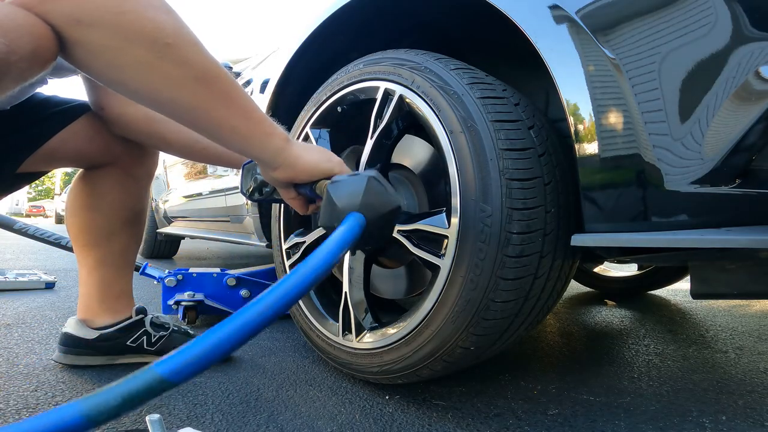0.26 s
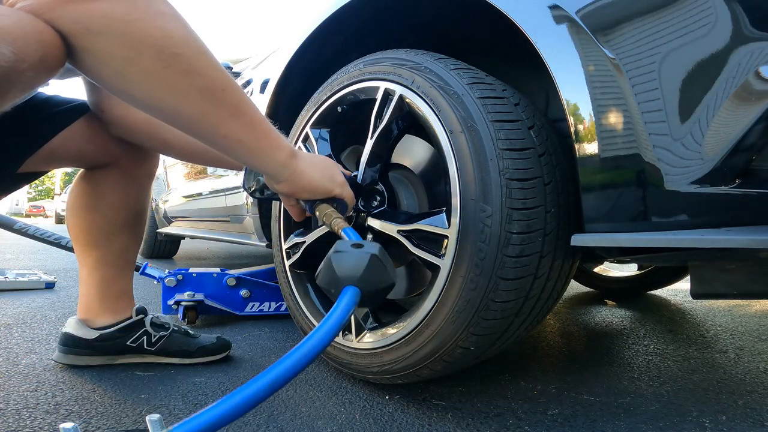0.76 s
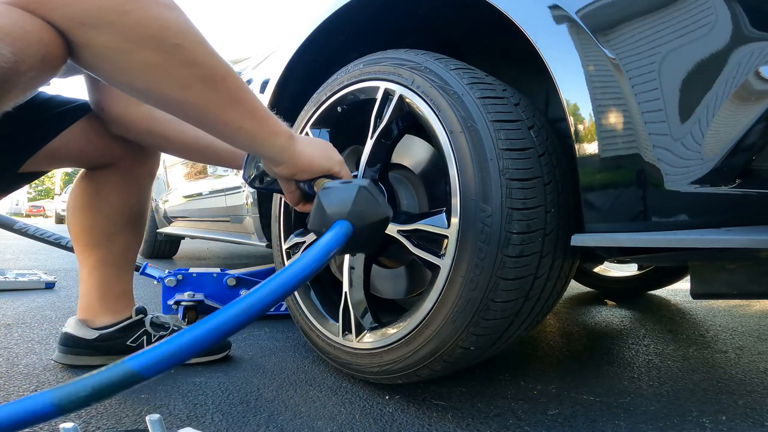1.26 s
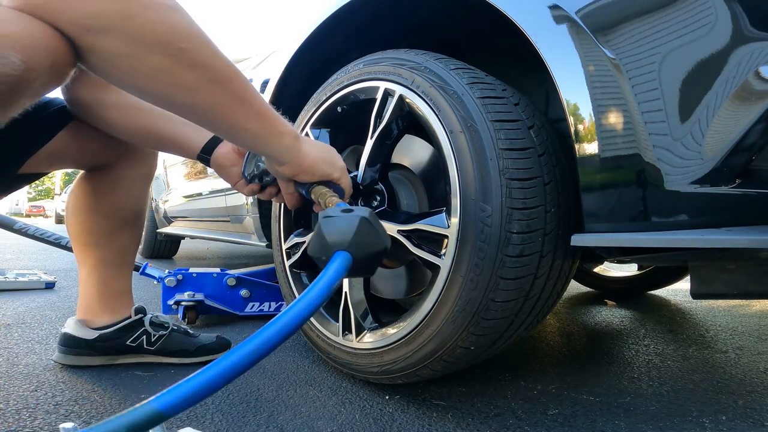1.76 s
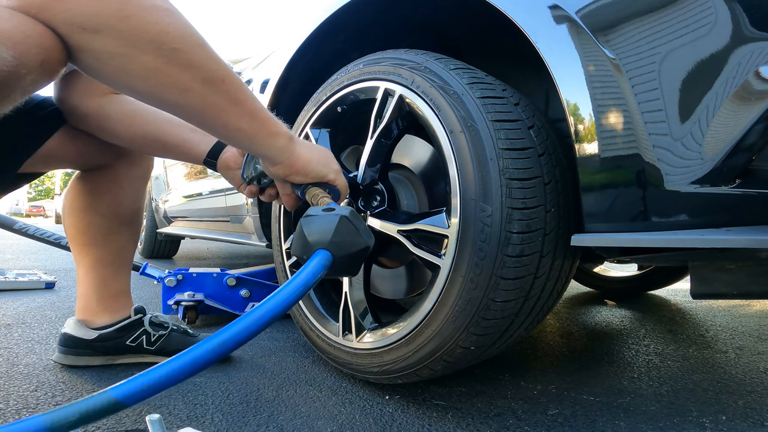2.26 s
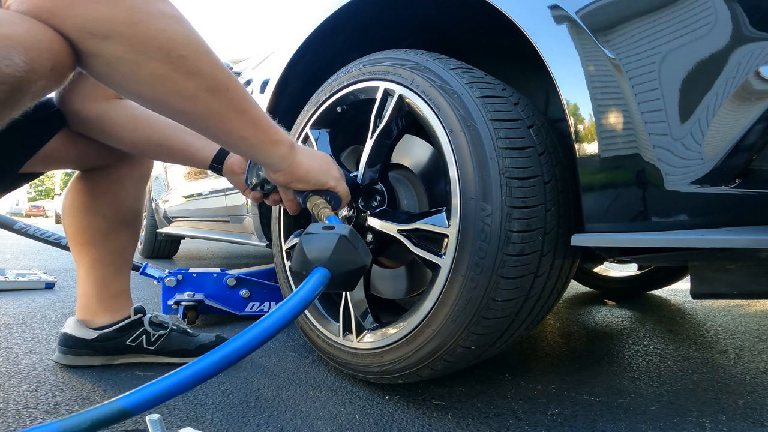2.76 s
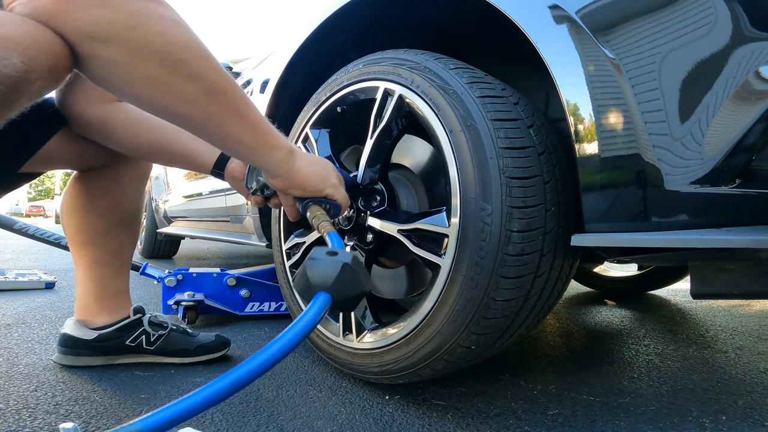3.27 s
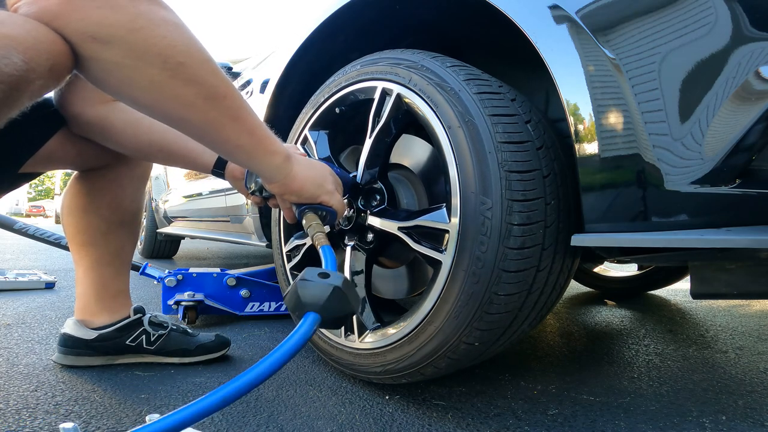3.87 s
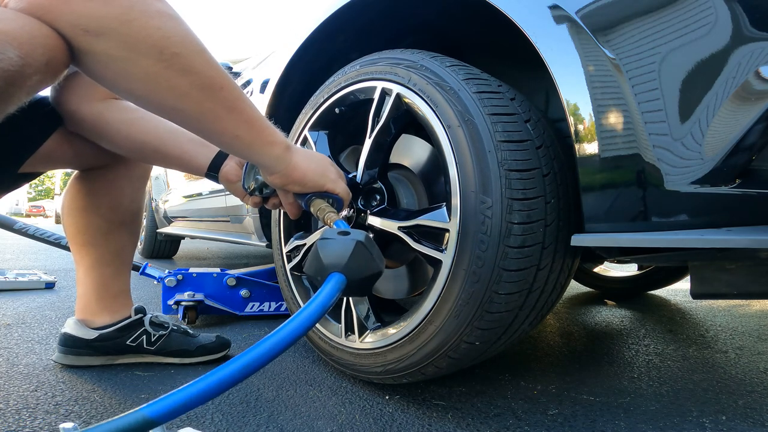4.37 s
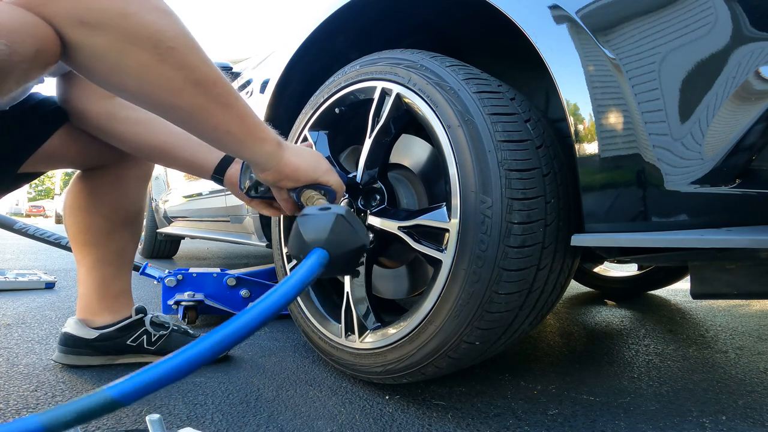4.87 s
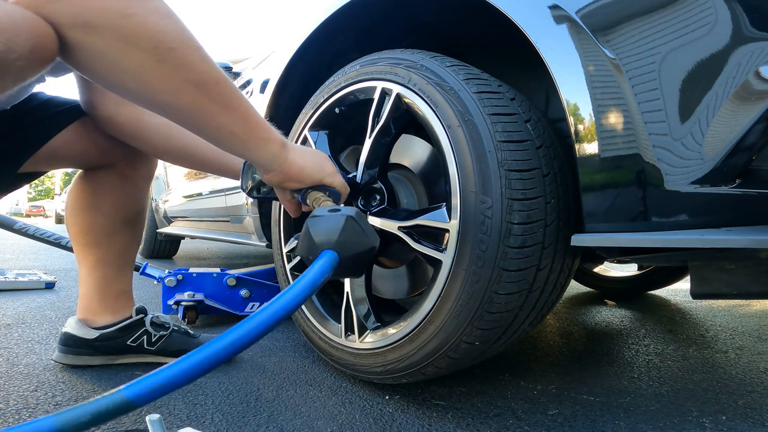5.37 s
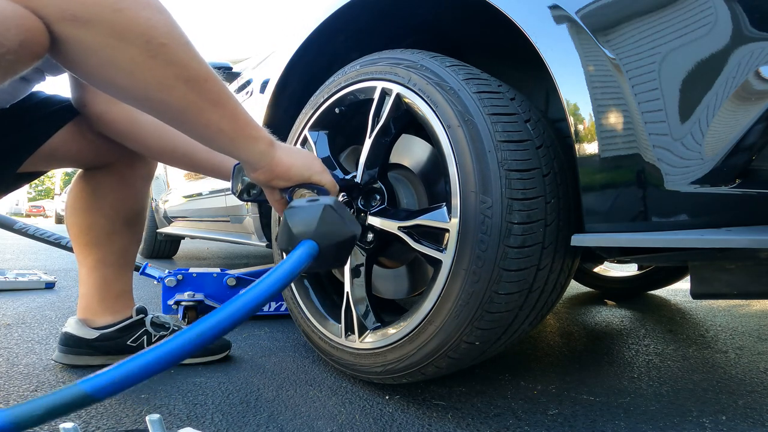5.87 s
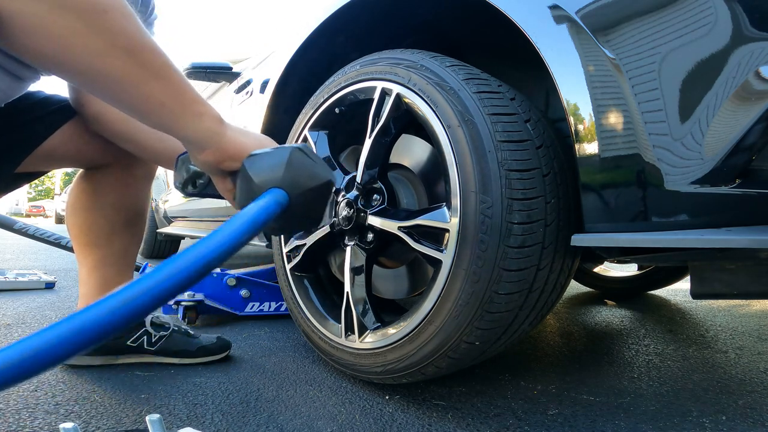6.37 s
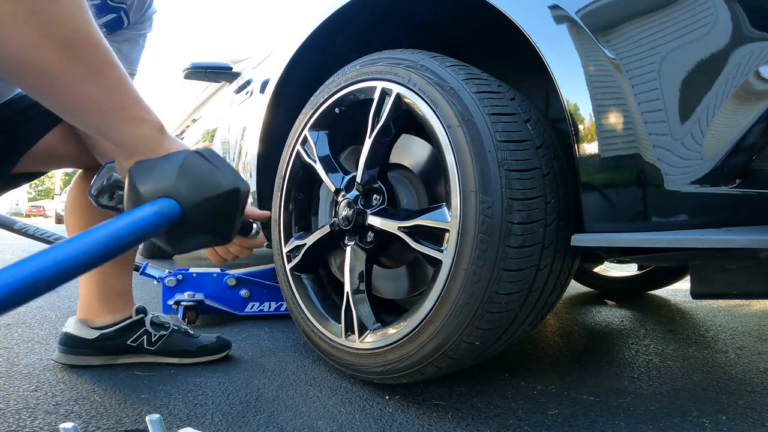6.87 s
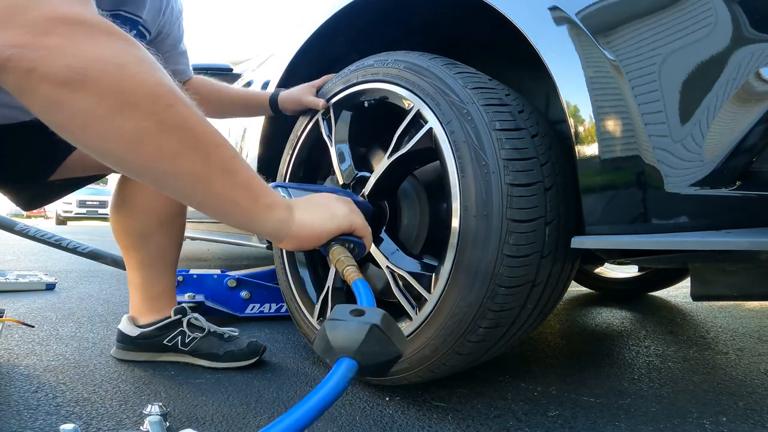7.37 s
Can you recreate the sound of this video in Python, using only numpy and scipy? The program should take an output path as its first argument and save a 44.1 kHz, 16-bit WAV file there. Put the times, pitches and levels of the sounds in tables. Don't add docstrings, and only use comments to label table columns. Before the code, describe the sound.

Close to a car wheel outdoors, a leaking air hose whistles and hisses for about two seconds, with one sharp metal tick. The wrench vents and hammers briefly, pauses, then fires several clanking bursts with exhaust blasts, tyre thuds and rim ringing. Two last pulls free the motor, which whirs upward and coasts down. Loose metal knocks follow while the hiss returns. Small nearby camera, nearly mono, with faint traffic rumble.

```python
import sys
import numpy as np
from scipy import signal
from scipy.fft import rfft, irfft, next_fast_len
from scipy.io import wavfile
from scipy.ndimage import uniform_filter1d, map_coordinates

SR = 44100
rng = np.random.default_rng(int(sys.argv[2]) if len(sys.argv) > 2 else 0)


def level_to_linear(level):
    exponent = np.asarray(level, float) / 20
    return 10 ** exponent


def to_wav(sig):
    pcm = np.clip(np.atleast_2d(sig), -1, 1) * 32767
    pcm = np.round(pcm).astype(np.int16)
    wavfile.write(sys.argv[1], SR, pcm.T)


N = 336042
T = np.arange(N) / SR


def unit(x):
    return x / np.sqrt(np.mean(x ** 2) + 1e-20)


def along(points, hz):
    f, v = np.transpose(points)
    return np.interp(np.log(hz + 1), np.log(f + 1), v)


def curves(rows, silent=None):
    s, *columns = np.transpose(rows)
    return np.array([np.interp(T, s, column, silent, silent) for column in columns])


def swells(rows):
    return sum(depth_db * np.exp(-((T - s) / length * 2) ** 4) for s, length, depth_db in rows)


def wobble(rate):
    return map_coordinates(rng.standard_normal(int(N * rate / SR) + 4), [T * rate])


def filtered(x, response):
    m = next_fast_len(N + SR // 2)
    return irfft(rfft(x, m) * response(np.fft.rfftfreq(m, 1 / SR)), m)[..., :N]


def cavities(peaks):
    def response(f):
        return sum((-1) ** k * level_to_linear(db) * 1j * f * width / (hz * hz - f * f + 1j * f * width)
                   for k, (hz, width, db) in enumerate(peaks))
    return response


def split(x, low_hz, high_hz):
    edges = np.array([[low_hz], [high_hz]])
    low, below = filtered(x, lambda f: 1 / (1 + (f / edges) ** 12))
    return low, below - low, x - below


# t/s, peak level/dB, rim level/dB, ping f/Hz, ping over crack level/dB
JAW_BLOWS = [(2.4115, -2, -15, 2820, 0), (2.4182, -0.5, -7.5, 2870, 1), (2.4359, 1, -15.5, 3500, -4),
             (2.4528, 2, -23, 2780, -8), (3.3338, -4, -4, 3010, -2), (3.348, 0.5, -30, 2550, -3),
             (3.357, -3, -17, 3400, 9), (3.379, -5, -13, 2450, -7), (3.3975, -0.5, -17, 3370, 6.5),
             (3.4177, -2, -13, 5230, -2), (3.607, 1, -13, 2960, -4), (3.6285, 2, -19, 2500, -1),
             (3.6496, -0.5, -6.5, 3050, -7), (3.6694, -1.5, -15, 3450, 8), (3.6888, -11, -10, 2780, -3),
             (3.7093, -2.5, -4, 3440, 2), (3.9027, -10, -15, 2600, -8), (3.908, -0.5, -7.5, 3160, -8),
             (3.924, -1.5, -8, 3520, 3), (3.944, -17, -17, 2800, -4), (3.961, 0, -12, 3470, -8),
             (3.982, -9, -7, 3030, -3), (3.9999, -1, -9.5, 3500, -10), (4.2531, -0.5, -18, 3300, 5.5),
             (4.2722, -5.5, -12.5, 3520, 5), (4.2884, -6.5, -2, 2780, 8), (4.637, -8, -28, 2960, 9),
             (4.6534, -5, -6, 2960, 5), (4.6723, -3.5, -13, 2800, 6), (4.677, -13.5, -12, 1760, 9),
             (4.7556, -10.5, -6, 1770, 10.5), (5.5224, 1.5, -16, 2800, 0), (5.81, 0.5, -25, 2550, 0)]
# t/s, peak level/dB, rim level/dB, ping f/Hz
SINGLE_BLOWS = [(0.6026, -8.5, -15, 2700), (2.3947, -18, -19, 2770), (2.4928, -1, -10, 3860),
                (2.5202, -12, -1.5, 3640), (3.0296, -16, -8.5, 2340), (3.4458, 0, -9.5, 3800),
                (3.551, -11.5, -3, 2750), (3.557, -6.5, -6, 1610), (3.59, -8, -16, 2550),
                (3.8295, -8.5, -3.5, 3800), (3.842, -18.5, 5, 2610), (3.8863, -3.5, -31, 3040),
                (4.0341, -3, -4, 2800), (4.0764, -5.5, -8, 4100), (4.2367, -7, -36, 3080),
                (4.33, -11, -12, 2500), (4.349, -3, -6.5, 2980), (4.3905, -30, 10.5, 2820),
                (4.6331, -0.5, -32, 2620), (4.726, -5, -28, 2510), (4.7519, 1, -16.5, 3200),
                (5.4177, -27, 6.5, 1080), (5.503, -24, 3, 2430), (5.5743, -2, -5, 2670),
                (5.7945, -9, -4.5, 2740)]
# t/s, peak level/dB, rim level/dB, ping f/Hz
LOOSE_KNOCKS = [(6.376, -19, -4, 1058), (6.39, -5.5, -3, 1970), (6.43, -15, -4, 794),
                (6.437, -10, -15, 2200), (6.444, -2.5, -23, 7400), (6.49, -3, -13, 2200),
                (6.512, -15, -3, 1060), (6.617, -16, -20, 1910), (6.643, -13, -12, 2410),
                (6.664, -12.5, -7, 1090), (6.786, -10.5, -14, 1275), (6.805, -13.5, -21, 1100),
                (6.832, -19.5, -5, 1230), (7.578, -17, -7, 2200)]
# f/Hz, level/dB, t60/s
ANVIL_MODES = [(1673, -1, 0.04), (3040, 8, 0.019), (4920, 8.5, 0.014), (7000, -18, 0.014)]
# f/Hz, level/dB, t60/s
RIM_MODES = [(339, 5, 2.5), (506, -10, 1.5), (651, 1, 2.8), (851, -8, 1), (945, -5, 1.2), (1028, -9, .9),
             (1179, -6, 1), (1427, -6, 1.1), (1534, -5, 1.4), (1717, -13, .6), (1766, -8, .6)]
# f/Hz, width/Hz, level/dB
SOCKET_MODES = [(1000, 35, 0), (1782, 52, 0.5), (3800, 75, -3.5), (5260, 130, -24)]


def hammer():
    grip_s, grip_db = 3.6, -4.5
    ping_cycles, hard_hz = 2.56, 2220
    steel = np.zeros(N + SR)
    kicks, taps = np.zeros((2, N))
    t = np.arange(SR // 12) / SR
    burst = (t / 0.0019) * np.exp(1 - t / 0.0021)
    dull = signal.butter(1, 5360, fs=SR)
    contacts = [(*row, 0) for row in SINGLE_BLOWS + LOOSE_KNOCKS] + JAW_BLOWS
    for s, db, rim_db, ping_hz, ping_db in contacts:
        scatter_db = rng.normal(0, 2.5, len(ANVIL_MODES))
        ring = 0
        for (hz, level_db, t60), extra_db in zip(ANVIL_MODES, scatter_db):
            decay = level_to_linear(level_db + extra_db - 60 * t / t60)
            ring = ring + decay * np.sin(2 * np.pi * hz * rng.normal(1, 0.027) * t)
        swell = t * ping_hz / ping_cycles
        hard = min(ping_hz / hard_hz, 1)
        ping = level_to_linear(ping_db) * 1.53 / hard * swell * np.exp(1 - swell) * np.sin(2 * np.pi * ping_hz * t)
        chatter = rng.standard_normal((2, len(t)))
        rattle = 2.38 * burst * chatter[0] + 0.42 * level_to_linear(-60 * t / 0.2) * chatter[1]
        crack = signal.lfilter(*dull, rattle)
        blow = hard * ((1 - np.exp(-t / 0.0023)) * ring + crack) + ping
        steel[round((s - .001) * SR):][:len(t)] += level_to_linear(db - 14.5) * blow
        kicks[round(s * SR):][:60] = level_to_linear(db + rim_db) * chatter[1, :60] / np.sqrt(60)
        taps[round(s * SR)] = level_to_linear(db + rim_db + grip_db * (s > grip_s))
    bright = filtered(steel[:N], lambda f: 1j * f / (900 + 1j * f))
    ringing = filtered(taps, cavities([(hz, 2.2 / t60, db) for hz, db, t60 in RIM_MODES]))
    knock = cavities([(567, 92, -3.0), (1000, 74, 5.5), (1825, 236, 1.0)])
    socket = cavities(SOCKET_MODES)
    return bright + level_to_linear(41) * ringing + filtered(kicks, lambda f: level_to_linear(34) * knock(f) + level_to_linear(37.0) * socket(f))


# t/s, peak level/dB
TURN_JOLTS = [(2.41, -2.5), (2.4462, -3.5), (3.3269, -4), (3.3703, -4), (3.412, -5.5), (3.599, -5.5),
              (3.6405, -4), (3.679, -6.5), (3.8991, -7), (3.9372, -7.5), (3.9726, -6), (4.245, -14),
              (4.283, -24), (4.645, -12), (5.513, -7), (5.7999, -9.5)]
# t/s, peak level/dB
SINGLE_JOLTS = [(2.124, -28), (2.393, -17), (2.472, -25), (2.489, -22), (2.5105, -20), (2.522, -20),
                (3.02, -34), (3.31, -10.5), (3.385, -19), (3.5813, -16), (3.6163, -22), (3.697, -22),
                (3.822, -17), (4.0013, -21), (4.0748, -24), (4.231, -20), (4.264, -15), (4.624, -14.5),
                (5.497, -16), (5.7642, -19), (5.7857, -10), (6.441, -26), (6.483, -26), (6.517, -25),
                (6.609, -24), (6.641, -29), (6.667, -22), (6.751, -17), (6.781, -23), (6.81, -25),
                (7.552, -24), (7.561, -25), (7.597, -29)]


def tyre():
    thuds, t = np.zeros(N + SR), np.arange(SR // 8) / SR
    pulse = np.exp(-((t - .0115) / 0.0026) ** 2)
    tail = 0.033 * np.clip(t / 0.029, 0, 1) * level_to_linear(-60 * t / 0.17)
    swing = (pulse + tail) * (0.13 + np.cos(2 * np.pi * 175 * (t - .0098)))
    for s, db in SINGLE_JOLTS + TURN_JOLTS:
        thuds[round(s * SR):][:len(t)] -= level_to_linear(db) * swing
    return thuds[:N]


# t/s, peak level/dB, f/Hz, rise/cycles
LONE_PINGS = [(.6026, -1, 3200, 0.7), (0.604, -14, 5300, 1.7), (2.128, -29.5, 340, 1), (7.573, -32, 403, 2),
              (0.603, -34, 360, 2.6), (2.496, -18, 1690, 3.7), (2.524, -16.5, 1650, 2.9),
              (3.448, -10.5, 1680, 3.6), (3.7116, -14, 1600, 3.2), (3.841, -20, 1730, 3.4),
              (4.29, -12, 1640, 3.1), (4.351, -14, 1650, 4.3), (.6032, -30, 6800, 4.3),
              (4.654, -26, 8440, 8), (4.726, -18, 7400, 8), (5.502, -16, 1110, 1.7), (5.63, -20, 1030, 3),
              (5.645, -17.5, 1027, 2.7), (5.6747, -22, 1060, 1.6), (5.699, -21, 1010, 2.1),
              (5.715, -20, 1060, 2.1), (5.732, -21, 1060, 1.6), (5.754, -19.5, 1060, 1.7),
              (5.675, -22, 2700, 4), (5.697, -20, 2130, 3.7), (5.7155, -24, 2900, 3.5),
              (5.755, -24, 2300, 3.6), (5.789, -13, 1060, 1.9), (6.346, -24, 990, 2.7),
              (6.376, -13, 2773, 2.8), (2.437, -6.5, 1750, 3), (6.43, -14, 4350, 2.8),
              (6.4535, -22, 2880, 3.7), (3.589, -12, 2020, 3), (6.504, -21, 7400, 8.9),
              (6.555, -21, 2580, 7.2), (6.632, -21, 2810, 4), (6.682, -20.5, 2820, 5),
              (5.852, -15.5, 898, 7.4), (6.756, -22, 1090, 0.96), (1.516, -17, 4700, 10.5),
              (1.614, -13, 4660, 10.6), (1.749, -21, 4500, 3.8), (5.488, -13, 3020, 4.6),
              (5.496, -10, 2800, 5), (5.503, -12, 2680, 4), (4.078, -15.5, 3960, 10),
              (4.076, -7.5, 2520, 1.1), (4.033, -13, 3800, 3.9), (4.034, -14, 1050, 1.7),
              (6.39, -21, 7400, 8), (6.843, -33, 7300, 12)]


def pings():
    out, t = np.zeros(N + SR), np.arange(SR // 14) / SR
    for s, db, hz, cycles in LONE_PINGS:
        swell = t * hz / cycles
        out[round(s * SR):][:len(t)] += level_to_linear(db) * swell * np.exp(1 - swell) * np.sin(2 * np.pi * hz * t)
    return out[:N]


# t/s, rise/s, length/s, exhaust level/dB, low share level/dB
TRIGGER_PULLS = [(2.385, 0.014, 0.15, -22.5, -2.5), (3.324, 0.0083, 0.13, -18.5, -1.5),
                 (3.586, 0.011, 0.16, -17.5, -4.5), (3.882, 0.0094, 0.21, -17, -4),
                 (4.217, 0.027, 0.17, -24, -4), (4.613, 0.02, 0.177, -26, 0), (5.481, 0.08, 0.11, -23, 3.5),
                 (5.779, 0.04, 0.11, -21, 0.5)]
# f/Hz, level/dB per Hz
BLAST_SPECTRUM = [(240, 12.5), (400, 7.5), (738, 0), (928, 9.5), (1470, -4.5), (3410, -9), (4290, -17.5),
                  (5320, -26), (8950, -28), (11500, -39), (15500, -72)]
# f/Hz, width/Hz, level over the blast/dB
NOZZLE_MODES = [(5300, 390, 16), (7400, 83, 10)]


def exhaust():
    sag_db_per_s, boom_db_per_s, shut_s = 44, -12, 0.023
    whistle = cavities(NOZZLE_MODES)

    def colour(f):
        return level_to_linear(along(BLAST_SPECTRUM, f)) * np.hypot(1, abs(whistle(f))) * f ** 2 / (f ** 2 + 200 ** 2)

    low, body, top = split(filtered(rng.standard_normal(N), colour), 1870, 4200)
    upper = (body + top) / np.std(body)
    low = unit(low)
    air = np.zeros(N)
    for s, rise, length, db, low_db in TRIGGER_PULLS:
        since = np.clip(T - s, 0, length)
        opened = np.clip(np.minimum(since / rise, (length - since) / shut_s), 0, 1)
        level_db = db - 1.5 - sag_db_per_s * np.clip(since - rise, 0, length)
        boom = level_to_linear(low_db + boom_db_per_s * (since - length / 2)) * low
        air += opened * level_to_linear(level_db) * (upper + boom)
    return air * level_to_linear(3 * wobble(110))


# t/s, rise/s, hold/s, level/dB
VALVE_VENTS = [(2.167, 0.018, 0.047, -8.5), (2.231, 0.0026, 0.013, -10.5), (2.357, 0.02, 0.022, -5.5),
               (3.292, 0.015, 0.0095, -5), (3.569, 0.018, 0.0042, -13.5), (3.876, 0.011, 0.0047, -13.5),
               (4.607, 0.011, 0.0049, -20), (5.465, 0.027, 0.0075, -7.5), (5.762, 0.02, 0.0097, -12.5)]
# f/Hz, width/Hz, level/dB
VALVE_MODES = [(1000, 265, -2), (1970, 130, 2), (2550, 180, 8), (3200, 120, 3), (3673, 52, 6.5),
               (4800, 114, 3.5), (5730, 43, 5), (8500, 10400, -11.5)]


def vents():
    opening = 0
    for s, rise, hold, db in VALVE_VENTS:
        corners = np.cumsum([s, rise, hold, 0.0058])
        opening = opening + level_to_linear(db - 5.0) * np.interp(T, corners, [0, 1, 1, 0]) ** 1.37
    return opening * unit(filtered(rng.standard_normal(N), cavities(VALVE_MODES)))


# t/s, length/s, top vane rate f/Hz, pulse level/dB, hum level/dB
NUT_RACES = [(3.988, 0.069, 318.3, -27.5, -23.5), (4.276, 0.066, 210, -23.5, -28),
             (4.672, 0.0773, 189, -24.5, -37)]


def races():
    loose_hz = 128
    u = np.linspace(0, 1, 7)
    edge_db = 0.5 * (2 * u - 1) ** 2
    rows = []
    for s, length, top_hz, db, hum_db in NUT_RACES:
        rate_hz = loose_hz + (top_hz - loose_hz) * np.sin(u * np.pi / 2)
        rows.append(np.transpose([s + u * length, rate_hz, db - edge_db, hum_db - edge_db]))
    return rows


# t/s, vane rate f/Hz, pulse level/dB, hum level/dB
FREE_SPINS = [
    [(5.535, 141.7, -31, -40), (5.56, 210.6, -20, -22), (5.58, 220.7, -23, -22), (5.62, 184.7, -33, -34),
     (5.655, 163.2, -34.5, -57), (5.72, 125, -31, -53)],
    [(5.822, 165.2, -25, -22), (5.854, 272, -22, -20), (5.895, 314.2, -32, -31),
     (5.934, 274.7, -21.5, -19.5), (5.998, 219.9, -28.5, -18.5), (6.114, 155.8, -24.5, -30),
     (6.17, 135.6, -28.5, -50), (6.25, 113.2, -29, -51), (6.404, 95, -33.5, -54)],
]
# f/Hz, width/Hz, level/dB
MUFFLER_MODES = [(205, 58, 1), (620, 200, -21), (960, 220, -1), (1170, 190, -3)]
# f/Hz, width/Hz, level/dB
PORT_MODES = [(1090, 230, -36), (2200, 510, 6.5), (3160, 440, -1), (4240, 110, -1)]
# multiple of the vane rate, level over pulse/dB
VANE_OVERTONES = [(2, -22), (3, -20), (4, -18), (5, -22)]


def motor():
    steady_hz = 210
    pulses, hiss, hum = np.zeros((3, N))
    uneven = level_to_linear(.7 * wobble(150))
    sticking = rng.standard_normal(N)
    fades_db = [4 * wobble(14) for _ in VANE_OVERTONES]
    (low_hz, low_width, _), *upper = MUFFLER_MODES
    for rows in races() + FREE_SPINS:
        rate_hz, pulse_db, hum_db = curves(rows)
        running = np.clip(np.minimum(T - rows[0][0], rows[-1][0] - T) / .008, 0, 1)
        turn = np.cumsum(uniform_filter1d(rate_hz, size=900)) / SR
        since_vane = (turn % 1) / rate_hz
        slow = np.clip(1 - rate_hz / steady_hz, 0, 1)
        limp = level_to_linear(2.5 * np.minimum(4 * slow, 1) * np.cos(2 * np.pi * turn / 3))
        smear = np.exp(-since_vane / 0.0088) * sticking * level_to_linear(7) * (slow + 0.064)
        clicks = np.diff(turn // 1, prepend=0) * np.sqrt(SR / rate_hz) * uneven
        pulses += running * level_to_linear(pulse_db) * limp * ((1 - slow) ** 6.3 * clicks + smear)
        hiss += running * level_to_linear(pulse_db) * np.exp(-since_vane / 0.0019)
        octave = level_to_linear(-32.5) / (1 + ((2 * rate_hz - low_hz) * 2 / low_width) ** 4)
        hum += running * (level_to_linear(hum_db + 3) * np.sin(2 * np.pi * turn) + octave * np.sin(4 * np.pi * turn))
        for (order, db), fade_db in zip(VANE_OVERTONES, fades_db):
            hum += running * level_to_linear(pulse_db + db + fade_db) * np.sin(2 * np.pi * order * turn)
    hiss *= uneven ** 3 * rng.standard_normal(N)
    puffs = level_to_linear(23.0) * filtered(pulses, cavities(upper)) + level_to_linear(18) * filtered(hiss, cavities(PORT_MODES))
    return puffs, hum


# t/s, flow level/dB, fizz over whistle level/dB (bend of the hose)
LEAK_FLOW = [(0, -18.5, -6.5), (.35, -19, -7), (.8, -17.5, -12), (1.35, -18.5, -8), (2.05, -19.5, -7),
             (2.32, -24.5, -7), (2.5, -34.5, -4.5), (2.93, -31, -5.5), (3.3, -28.5, -3.5), (3.5, -31, -7.5),
             (4.5, -40, 4), (4.9, -34.5, 5.5), (5.3, -34, 8.5), (5.72, -31.5, -1), (5.98, -21.5, -11.5),
             (6.35, -34.5, 5), (7.05, -28, 0), (7.62, -26.5, -2.5)]
# (f/Hz, width/Hz, level/dB)
TOOL_STANCES = [
    (0, [(1000, 100, 11), (1150, 140, 6.5), (2540, 195, 18.5), (2968, 144, 13.5), (3800, 260, -14), (4800, 560, -8.5), (5950, 260, -15), (6660, 370, -14)]),
    (2.45, [(1090, 460, 11), (2000, 220, 13), (2480, 350, 15), (2910, 200, 11.5), (4920, 240, -7), (5800, 150, -11)]),
    (3.4, [(2200, 1900, -10), (2660, 490, 1), (3770, 170, -21), (4800, 490, -35)]),
    (4.7, [(2120, 330, 3), (2830, 570, 4.5), (3800, 220, -4.5), (4280, 150, -7), (4730, 340, -5), (5830, 270, -11), (6780, 560, -15.5)]),
    (5.9, [(1080, 79, -4), (2470, 420, 9.5), (2830, 105, 10), (3210, 130, -8), (3850, 39, -29), (4670, 370, -12), (5730, 160, -15), (6750, 600, -21.5)]),
    (7.068, [(1246, 97, 6.5), (2310, 310, 13), (2916, 215, 10), (4570, 370, -8), (5640, 490, -9.5), (6560, 170, -15), (11040, 190, -23.5)]),
]
# whole leak level/dB, hollow part over whistle level/dB
STANCE_OPENNESS = [(0.1, -16), (0.1, -14), (0.1, -4.5), (0.1, -14), (0.1, -9), (5, -13)]
# f/Hz, level/dB per Hz
JET_SPECTRUM = [(300, -16), (650, -6), (1000, 3.5), (1600, -1.5), (2100, -0.5), (3400, -14), (5000, -14),
                (7500, -31), (11000, -31), (15500, -52.5)]
# t/s, length/s, change/dB
HOSE_KINKS = [(0.372, 0.1, 5), (0.436, 0.034, 5), (1.055, 0.043, 4.5), (1.25, 0.12, 1), (1.39, 0.12, 4.5),
              (1.515, 0.024, 3.5), (1.612, 0.049, 4.5), (1.648, 0.018, -3), (1.7, 0.045, 5),
              (1.765, 0.085, 5), (1.95, 0.16, 0.5), (2.1, 0.1, 5), (0.56, 0.41, -0.5), (4.85, 0.23, -3),
              (0.85, 0.34, -1), (6.822, 0.064, -10), (6.96, 0.041, -9.5)]
# t/s, length/s, change/dB
COUPLING_TURNS = [(.15, 0.5, 0), (1.3, 0.5, 1.5), (1.7, 0.14, 5), (2.05, 0.38, 0), (6.88, .2, -10)]


def leak():
    sheen_hz, sheen_surge, sheen_drop = 7550, 0.1, 0.72
    flare_hz, flare_width_hz, flare_grows = 4600, 520, 0.5
    air, whole_db, hollow_db = np.zeros((3, N))
    f = np.arange(0, SR / 2, 5)
    moved = [np.ones(N)] + [np.clip((T - s) / .03, 0, 1) for s, _ in TOOL_STANCES[1:]] + [np.zeros(N)]
    for k, (_, peaks) in enumerate(TOOL_STANCES):
        power = level_to_linear(2 * along(JET_SPECTRUM, f))
        for hz, width, db in peaks:
            power = power + level_to_linear(2 * db) / (1 + ((f - hz) * 2 / max(width, 90)) ** 2) ** 1.57
        colour = np.sqrt(power)
        held = np.abs(moved[k] - moved[k + 1])
        air += np.sqrt(held) * unit(filtered(rng.standard_normal(N), lambda at: np.interp(at, f, colour)))
        whole_db += held * STANCE_OPENNESS[k][0]
        hollow_db += held * STANCE_OPENNESS[k][1]
    bands = np.array(split(air, 1750, 3377))
    bands /= np.sqrt(np.abs(uniform_filter1d(bands ** 2, size=5000, axis=1)) + 1e-12)
    flow_db, fizz_db = curves(LEAK_FLOW)
    kink_db = swells(HOSE_KINKS)
    sheen = filtered(bands[2], lambda f: 1 - 1 / (1 + (f / sheen_hz) ** 8))
    sheen_db = np.where(kink_db > 0, sheen_surge, sheen_drop) * kink_db + swells(COUPLING_TURNS)
    flare = filtered(bands[2], lambda f: 1 / (1 + ((f - flare_hz) * 2 / flare_width_hz) ** 4))
    bands[2] += (level_to_linear(flare_grows * kink_db) - 1) * flare
    bands[2] = level_to_linear(kink_db) * (bands[2] - sheen) + level_to_linear(sheen_db) * sheen
    flutter_db = np.array([1.1 * wobble(25), .9 * wobble(40), 1.3 * wobble(22)])
    balance_db = np.array([hollow_db, 0 * T, fizz_db]) + flutter_db
    return level_to_linear(flow_db + whole_db) * np.sum(level_to_linear(balance_db) * bands, axis=0)


# f/Hz, t60/s
CAR_DECAY = [(150, 0.34), (1000, 0.35), (4000, 0.037), (12000, 0.11)]


def car(x):
    hz, t, z = signal.stft(rng.standard_normal(SR // 3), SR, nperseg=256)
    decay = level_to_linear(-60 * t / along(CAR_DECAY, hz)[:, None])
    tail = signal.istft(z * decay, SR, nperseg=256)[1]
    return signal.fftconvolve(np.pad(x, (300, 0)), tail / np.linalg.norm(tail))[:N]


# t/s, level/dB
YARD_LEVEL = [(0.0, -43), (2.63, -44), (2.97, -58), (3.35, -48), (3.48, -41), (3.88, -43), (4.46, -48.5),
              (5.43, -47), (5.9, -44), (6.3, -42.5), (6.98, -45.5), (7.62, -44)]
# f/Hz, level/dB per Hz
RUMBLE_SPECTRUM = [(20, -24), (70, -11.5), (105, 1), (145, -1), (216, 1), (420, -15), (900, -10),
                   (1320, -120)]


def yard():
    drift_db = wobble(12)
    rumble = filtered(rng.standard_normal(N), lambda f: level_to_linear(along(RUMBLE_SPECTRUM, f)))
    return level_to_linear(curves(YARD_LEVEL)[0] + drift_db) * unit(rumble)


# f/Hz, side minus mid level/dB
STEREO_WIDTH = [(60, -41), (500, -32), (2400, -41.5), (5000, -35.5), (10500, -15.5), (12500, 0.5)]


def scene():
    def shaded(f):
        return 1 / (1 + 1.2j * f / 7000 - (f / 7000) ** 2) ** 2.53 * (1j * f / (70 + 1j * f)) ** 2

    puffs, hum = motor()
    tool = exhaust() + filtered(hammer() + tyre() + puffs + vents(), shaded)
    mid = tool + level_to_linear(-12.5) * car(tool) + hum + leak() + yard() + pings()
    scatter = rng.standard_normal(1600) / 40
    side = filtered(signal.fftconvolve(mid, scatter)[:N], lambda f: level_to_linear(along(STEREO_WIDTH, f)))
    return np.array([mid + side, mid - side])


def band_limit(x):
    return signal.sosfilt(signal.butter(12, 15680, fs=SR, output="sos"), x)


def record(dry):
    top_hz = 15750
    x = dry / (1 + np.abs(dry / 1.05) ** 6) ** (1 / 6)
    x = filtered(x, lambda f: (1 - 0.99 / (1 + ((f - 8970) / 380) ** 2)) * (f < top_hz))
    return band_limit(x)


dry = scene()
out = record(dry)
to_wav(out)
```